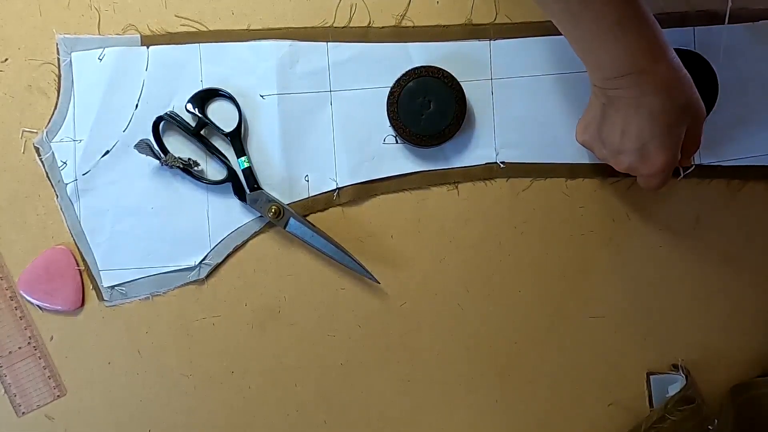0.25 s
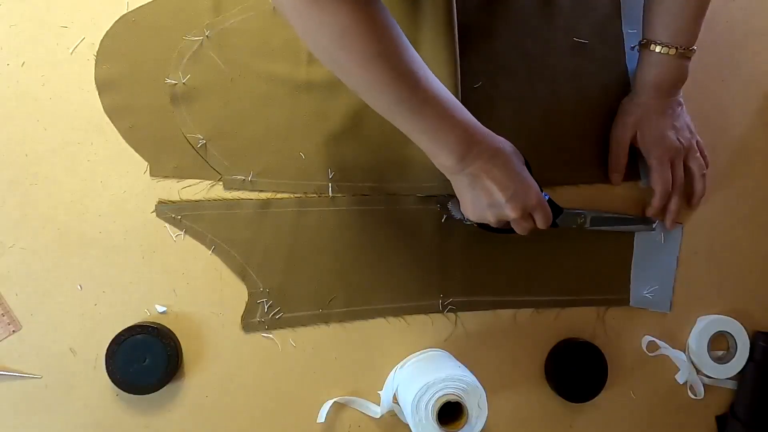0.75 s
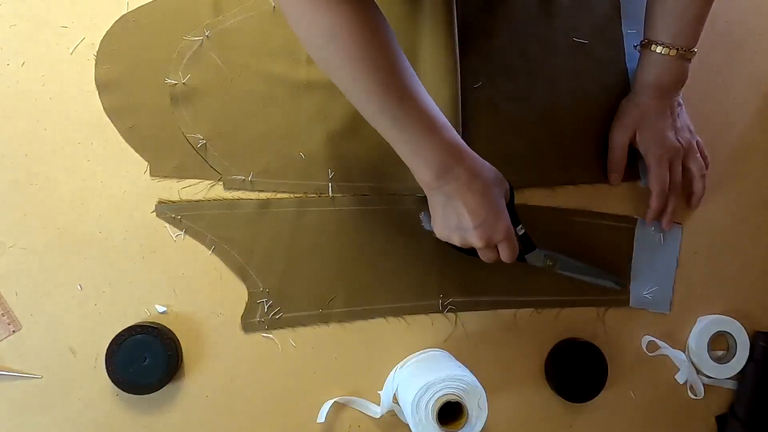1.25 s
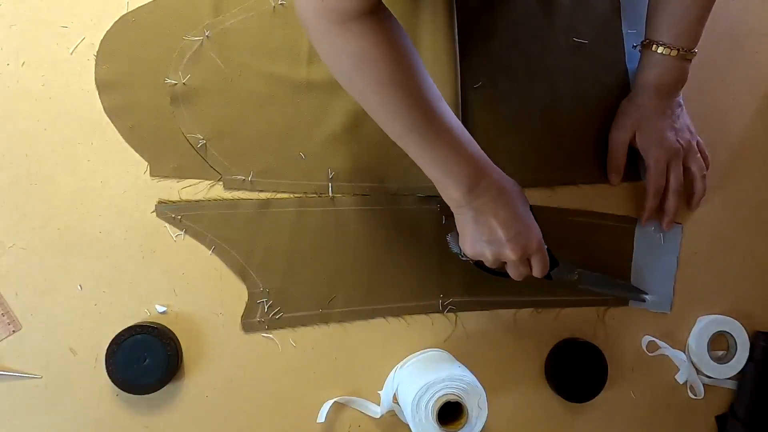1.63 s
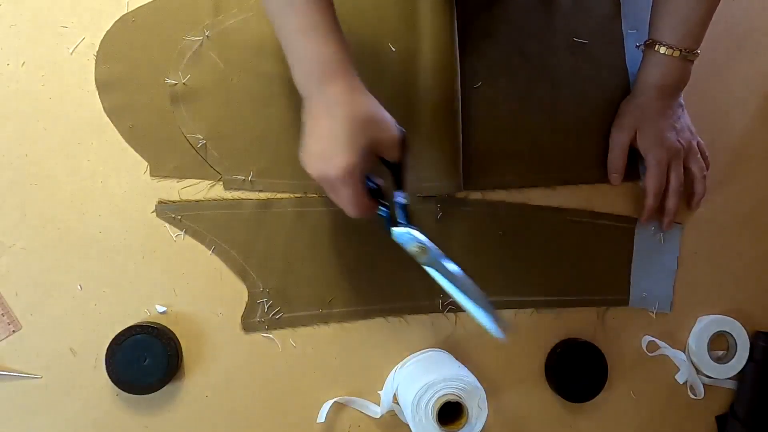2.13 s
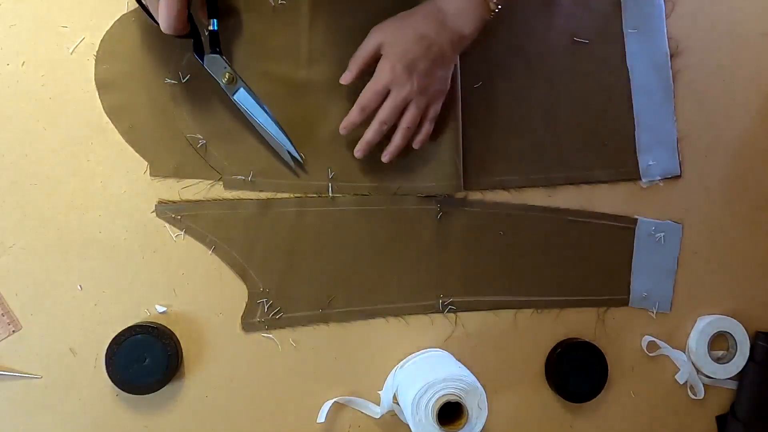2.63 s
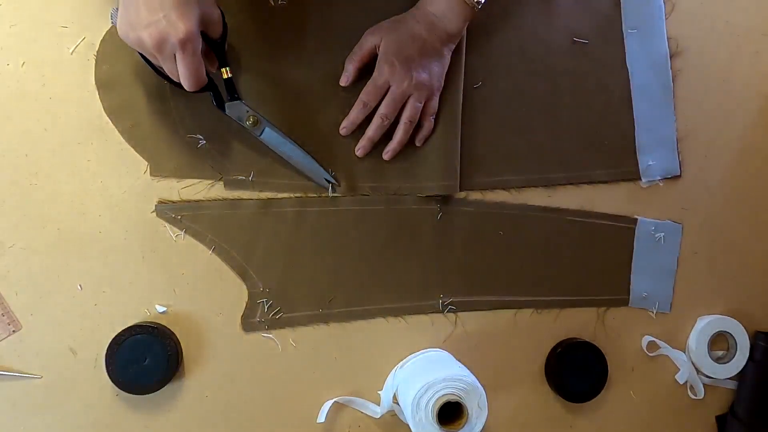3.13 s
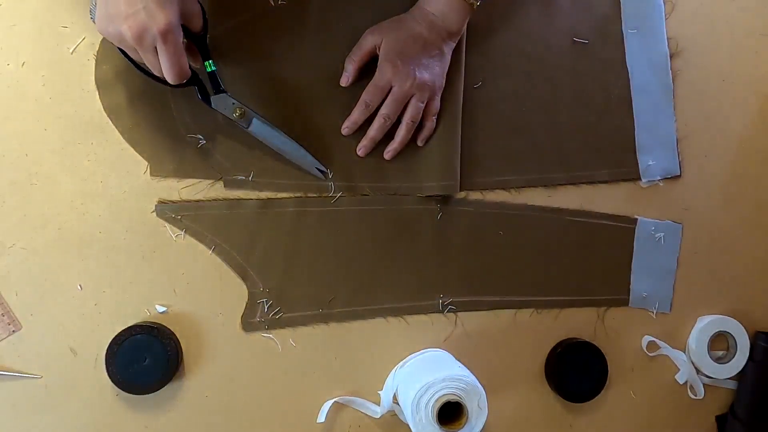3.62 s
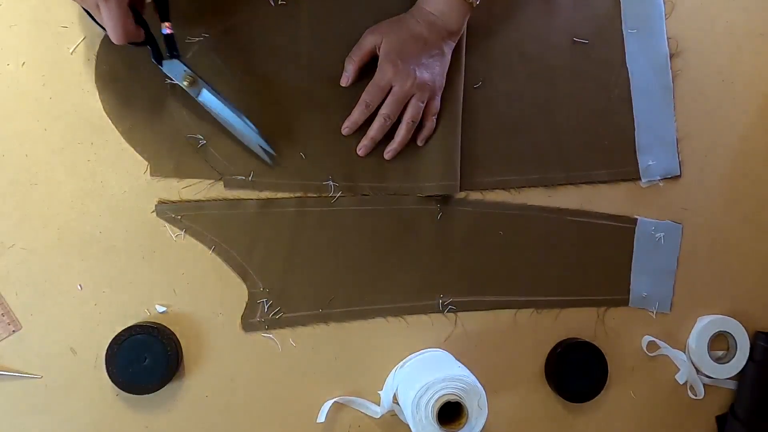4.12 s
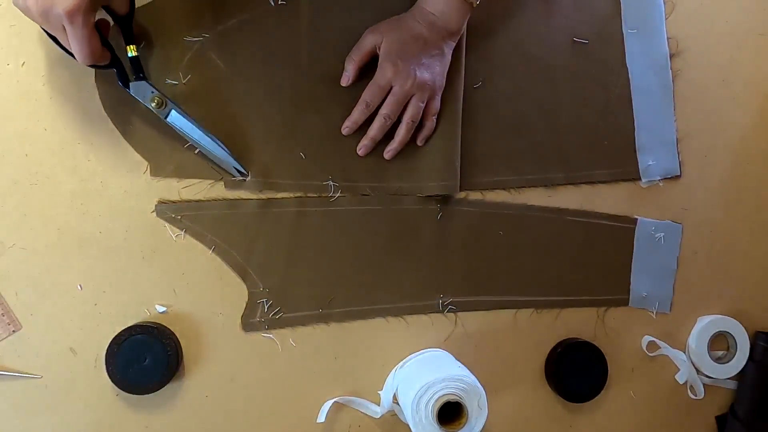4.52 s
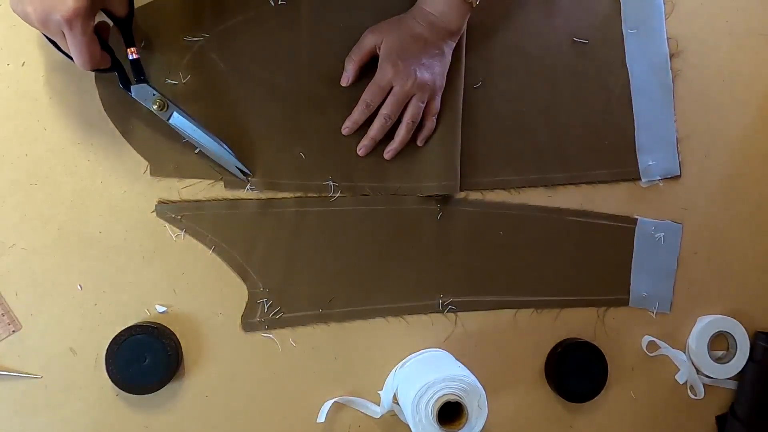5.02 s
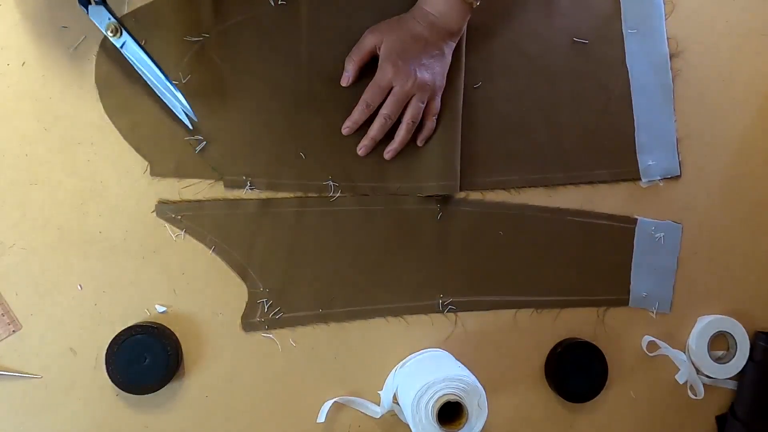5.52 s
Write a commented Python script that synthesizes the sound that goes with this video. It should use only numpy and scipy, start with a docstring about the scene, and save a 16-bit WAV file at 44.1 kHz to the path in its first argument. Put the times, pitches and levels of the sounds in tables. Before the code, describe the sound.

Eight uneven scissor snips, dry and close, with dull bumps through the tabletop, a brief hand sweep on fabric and faint room air.

```python
"""Tailor's shears snip threads on cloth over a wooden worktable, a two-port phone held above.
Blades hiss shut and open as friction noise drives steel modes; their clacks are decaying steel modes.
Blows and a murmur sound the table's low modes, the handles thud, and shaped noise makes a hand's
sweep over the cloth, the reflections and the room air. Early on a low hum is cut by a brief silence."""
import sys
import numpy as np
from scipy import signal
from scipy.fft import rfft, irfft
from scipy.io import wavfile
from scipy.ndimage import uniform_filter1d

SR = 44100
rng = np.random.default_rng(int(sys.argv[2]) if len(sys.argv) > 2 else 0)


def dump(signal):
    """Clip the signal to [-1, 1] and save it as 16-bit WAV at the path in sys.argv[1]."""
    limited = np.clip(np.atleast_2d(signal).T, -1, 1)
    pcm = np.round(limited * 32767).astype(np.int16)
    wavfile.write(sys.argv[1], SR, pcm)


N = 254016
T = np.arange(N) / SR
HZ = np.maximum(np.fft.rfftfreq(N, 1 / SR), 1)

# Blades clacking shut, and at 1.371 s the shears landing on the table with a metal ring. # Each row: time in
# seconds, level in dB, brightness in dB per octave, # weight below 3 kHz in dB, lag of the left port in ms,
# peak of the handle thud in dB.
CLACK_EVENTS = [(.4751, -39, 2, 6.5, 0.0559, -41), (1.098, -48, 0, 7.5, 0.0553, -45),
                (1.371, -57, 3, -3.5, 0.0632, -47), (2.0034, -38, 1.76, 3.2, 0.0591, -49.5),
                (3.3902, -59.5, -3.5, 4.5, 0.0226, -62.5), (4.0615, -43, 2.01, 5.5, 0.024, -54.5),
                (4.8926, -48.5, 2, 4.5, .016, -58.5), (5.3685, -40.5, 3.5, 4.5, 0.0157, -50)]
# Steel modes of the shears. Each row: frequency in Hz, relative level in dB, t60 in seconds at damping 1.
STEEL_MODES = [(1021, -16.5, 0.032), (1288, -17.5, 0.047), (1657, -17, 0.043), (2153, -8, 0.033),
               (2441, -4.5, 0.02966), (3004, -10, 0.034), (3531.4, -12.5, 0.043), (3934, -7, 0.04),
               (4309, -4.5, 0.029), (4749, 3, 0.025), (5207, 0, 0.022), (5933, -4.5, 0.017),
               (6745, 0, 0.034), (7463, -2.5, 0.024), (7989, -6, 0.035), (8190, 2.5, 0.022),
               (8799, 1.5, 0.03364), (9545, 4, 0.015), (10225, -13, 0.046), (10930, -7, 0.02),
               (11936, -12, 0.031), (12557, -16, 0.039), (13470, -17.5, 0.033)]
STEEL_HZ = np.array(STEEL_MODES)[:, 0]
SLIDE_RANGE_DB = 30.5  # strokes start and end this far below full level
DROP_S, BACK_S = .3226, .338  # the silence begins and ends


def undb(db):
    """Amplitude ratio: decibels to gain."""
    return 10 ** (np.asarray(db) / 20)


def unit(x):
    """Power normalisation: scale to rms 1."""
    return x / np.sqrt(np.mean(x ** 2))


def along(curve, column=1, hz=HZ):
    """Interpolation of a table column on a log-frequency axis."""
    curve = np.array(curve)
    return np.interp(np.log(hz), np.log(curve[:, 0]), curve[:, column])


def gain(curve):
    """Amplitude envelope: a level curve in dB as gain, silent outside its span."""
    s, db = np.transpose(curve)[:2]
    level_db = np.interp(T, s, db, left=-200, right=-200)
    return uniform_filter1d(undb(level_db), size=99)


def walk(rate):
    """Slow random modulation: levels held 1 / rate seconds and smoothed twice, rms near 1."""
    hold = int(SR / rate)
    steps = np.repeat(rng.standard_normal(N // hold + 1), hold)
    return 1.3 * uniform_filter1d(uniform_filter1d(steps, hold), hold)[:N]


def ring(modes, seconds, tilt_db=0., scatter_db=0., damp=0.6, turn=0.):
    """Modal superposition: a struck body answers in decaying sines; damp multiplies the decay rate."""
    hz, db, t60 = np.transpose(modes)[:, :, None]
    t = np.arange(round(seconds * SR)) / SR
    size = undb(db + tilt_db * np.log2(hz / 5000) + np.reshape(scatter_db, (-1, 1)))
    sines = np.sin(2 * np.pi * (hz * t + np.reshape(turn, (-1, 1))))  # turn in cycles
    decay = np.exp(-np.log(1000) * t * damp / t60)
    return np.sum(size * sines * decay, axis=0)


def add(track, s, x):
    """Linear superposition: mix x into track from time s."""
    i = int(s * SR)
    track[..., i:i + x.shape[-1]] += x[..., :N - i]


def octave_band(hz, centre):
    """Raised-cosine weighting: one octave to each side of the centre, neighbours summing to 1."""
    return np.cos(np.pi / 2 * np.clip(np.log2(hz / centre), -1, 1)) ** 2


def treble(x, hz, db):
    """Shelving filter: raise or lower what lies above hz."""
    top = irfft(rfft(x) / (1 + (hz / HZ) ** 2), N)
    return x - top + top * undb(db)


def diffuse(colour, flicker_db, alike_more=0.):
    """Partial coherence: octave bands of noise flicker independently, partly shared by both ports."""
    # Likeness of the ports in diffuse sound. Each row: frequency in Hz, likeness from 0 to 1.
    likeness = [(100, 0), (350, 0.4), (2000, 0.28), (5000, 0.08), (12000, 0.2)]
    alike = np.clip(along(likeness) + alike_more, 0, 1)
    noise = rfft(rng.standard_normal((2, N))) * undb(along(colour))
    mid, side = noise * np.sqrt([1 + alike, 1 - alike])
    pair = np.array([mid + side, mid - side])
    out = 0
    for centre in 125 * 2. ** np.arange(8):
        flicker = undb(flicker_db * walk(11))
        out = out + flicker * irfft(pair * octave_band(HZ, centre), N)
    return unit(out)


def air():
    """Diffuse field: room noise whose level and treble drift."""
    # Noise spectrum. Each row: frequency in Hz, relative density in dB per Hz.
    colour = [(70, -47), (120, -9), (150, -4), (210, -6), (370, -10), (490, -12), (560, -18.5), (850, -21),
              (1000, -18.5), (1260, -19), (3000, -28), (6200, -29.5), (8500, -37), (11000, -43),
              (14000, -56.5)]
    # Drift. Each row: time in seconds, level in dB ahead of the treble change, treble gain in dB.
    drift = [(0., -66.5, 12), (.12, -65, -3), (.37, -61, -1.5), (.55, -60.5, 9), (.9, -63, -1.68),
             (1.15, -62.5, 2), (1.54, -64.5, 4.5), (1.9, -65.5, 2.77), (2.3, -63, -1), (2.98, -64, -1.5),
             (3.82, -65, -5.5), (4.302, -65.5, 4.5), (4.669, -66, -0.77), (5.76, -64, -9)]
    s, _, treble_db = np.transpose(drift)
    return treble(diffuse(colour, 1.0), 2600, np.interp(T, s, treble_db)) * gain(drift)


def cloth():
    """Friction noise: fibres hiss under the sweeping palm and get duller as it slows."""
    # Hiss spectrum. Each row: frequency in Hz, relative density in dB per Hz.
    colour = [(300, -10.5), (700, -10), (1020, -3), (1250, -3.5), (1560, 0.5), (1750, -3), (1940, 0.5),
              (2400, -5.5), (3000, -2.5), (3800, -5), (6000, -9), (10000, -24), (14000, -37.5)]
    # Course of the sweep. Each row: time in seconds, level in dB ahead of the treble change.
    sweep = [(2.22, -73.5), (2.27, -68.5), (2.38, -60.5), (2.46, -56.5), (2.58, -54.5), (2.68, -60),
             (2.78, -66.5), (2.9, -85)]
    # Ticks of a bracelet on the sweeping hand. Each row: start in seconds, level in dB, frequency in Hz, t60 in
    # seconds at damping 1.
    bracelet_ticks = [(2.386, -51, 3850, .06), (2.655, -54, 1600, .08)]
    start_treble_db, dulling_db_s = 14, 65.5
    hiss = diffuse(colour, 1.8, .2) * undb(1.2 * walk(45))
    treble_db = np.clip(start_treble_db - dulling_db_s * (T - sweep[0][0]), -60, 20)
    out = treble(hiss, 2830, treble_db) * gain(sweep)
    for s, db, hz, t60 in bracelet_ticks:
        tick = ring([(hz, db, t60)], .1)
        add(out, s, np.convolve(tick, np.hanning(9) / 4))  # softened onset
    return out


def low_hum():
    """Amplitude modulation: a steady low sine rises quickly, wavers in level and stops."""
    hum_hz, full_s, level_db, rise_db_ms = 60.3, 0.17, -39.5, 5.55
    waver_db, waver_hz = 1.5, 11
    since_full = T - full_s
    waver = waver_db * np.cos(2 * np.pi * waver_hz * since_full)
    rise = rise_db_ms * 1000 * np.minimum(since_full, 0)
    sine = -np.sqrt(2) * np.cos(2 * np.pi * hum_hz * (T - DROP_S))
    return sine * undb(level_db + waver + rise) * (T < BACK_S)


def worktable():
    """Modal excitation: blows and a noise-driven murmur sound the low modes of the table top."""
    # Knocks, as when the shears land. Each row: start in seconds, peak in dB,
    # hardness in dB per octave, damping as a factor on the decay rate.
    knocks = [(0.472, -40, -13.5, .38), (.654, -30.5, -9, 0.399), (1.367, -24.5, 3, 0.908),
              (1.984, -39, -6.5, 1.4), (2.304, -41, -7, 1.13), (2.581, -47, -10.5, 1.1),
              (2.8536, -25, 3.5, .86), (3.351, -41.5, 5.5, 0.26), (3.5639, -27.5, -1.5, 0.42),
              (3.971, -39.5, -5.5, 0.72), (4.067, -38, -8, 2.1), (4.321, -20.5, 1.87, 0.739),
              (4.885, -48, 8.5, 1.04), (5.363, -35.5, -10, 0.62), (5.7535, -21, 12, .37)]
    # Table-top modes. Each row: frequency in Hz, relative level in dB, t60 in seconds at damping 1.
    modes = [(43, -10, 0.26), (69.83, 1, 0.2324), (93.56, 2, 0.13), (125.68, 3.5, 0.1137),
             (153.25, -8, .21), (206.02, -5, 0.067), (273.9, -22, 0.15), (330.1, -17, 0.046),
             (392.3, -29, .1)]
    # Murmur of arms shifting their weight. Each row: time in seconds, level in dB.
    murmur_level = [(0., -43.5), (.14, -58.5), (.29, -54.5), (.55, -55), (1.01, -57), (1.28, -65),
                    (1.51, -51), (1.76, -66), (1.92, -53.5), (2.4, -67), (2.79, -57), (3.2, -67),
                    (3.45, -57.5), (4.4, -60), (4.75, -60.5), (4.97, -52.5), (5.42, -62.5), (5.76, -57.5)]
    swell_ms = 4.78
    out = np.zeros(N)
    t = np.arange(SR // 4) / SR
    for s, db, tilt_db, damp in knocks:
        # the boom needs a moment to spread over the top, and is gone after a quarter second
        swell = np.tanh((t * 1000 / swell_ms) ** 2)
        boom = ring(modes, len(t) / SR, tilt_db, damp=damp) * swell * np.cos(2 * np.pi * t)
        add(out, s, -boom * undb(db) / abs(boom).max())
    turn = np.arange(len(modes)) / 2
    response = ring(modes, 0.23, -5.0, damp=2.0, turn=turn)
    murmur = unit(signal.fftconvolve(rng.standard_normal(N), response)[:N])
    return out + murmur * gain(murmur_level)


def thuds():
    """Impact excitation: the plastic handles bump together as the blades close or the shears land."""
    # Handle modes. Each row: frequency in Hz, relative level in dB, t60 in seconds at damping 1.
    modes = [(252, 1.5, 0.052), (368.6, -8.5, 0.25), (501, 0, 0.033), (730.5, -8.5, 0.14),
             (973, -10.5, 0.088)]
    out = np.zeros(N)
    for s, *_, db in CLACK_EVENTS:
        bump = ring(modes, 0.042, turn=rng.random(len(modes)))
        bump = np.convolve(bump, np.hanning(24))  # soft contact
        add(out, s, bump * undb(db) / abs(bump).max())
    return out


def reflections(x):
    """Reverberation: table, cloth and walls return a noise tail whose treble dies first."""
    # Decay of the room. Each row: frequency in Hz, t60 in seconds.
    decay_times = [(1000, 0.16), (4000, 0.13), (14000, 0.018)]
    gap_s = 0.00068  # time constant of the tail's onset
    t = np.arange(int(.35 * SR)) / SR
    hz = np.maximum(np.fft.rfftfreq(len(t), 1 / SR), 1)
    noise = rng.standard_normal((3, len(t)))
    noise = rfft(noise[:2] + 0.63 * noise[2])  # the third is shared by both ports
    tail = 0
    for centre in 500 * 2. ** np.arange(6):
        decay = np.exp(-np.log(1000) * t / along(decay_times, hz=centre))
        tail = tail + irfft(noise * octave_band(hz, centre), len(t)) * decay
    tail = tail * (1 - np.exp(-t / gap_s))
    tail = tail / np.sqrt(np.sum(tail ** 2) / 2)
    return signal.fftconvolve(x[None], tail, axes=1)[:, :N]


def slide(out, s, db, brightness, rise, hold_ms, fall, dulling=0., stop=np.inf):
    """Friction excitation: grit drives steel damped by the pressed blades; slopes in dB per ms."""
    end_ms = min(hold_ms + SLIDE_RANGE_DB / abs(fall), (stop - s) * 1000)
    ms = np.arange(-SLIDE_RANGE_DB / rise, end_ms, 1000 / SR)
    count = len(ms)
    grit = rng.standard_normal(6000) * undb(2.2 * rng.exponential(size=6000))
    turn = rng.random(len(STEEL_MODES))
    weight_db = 2.0 * rng.standard_normal(len(STEEL_MODES))

    def scrape(tilt_db):
        """Convolution: grit filtered by the steel, its build-up left out."""
        response = ring(STEEL_MODES, 0.022, tilt_db, weight_db, 4.8, turn)
        return unit(np.convolve(grit, response)[900:900 + count])

    dull, bright = scrape(-4.0), scrape(6.0)
    share = np.clip(.5 + (brightness - dulling * np.maximum(ms, 0)) / 20, 0, 1)
    # a broad rasp leaves the edges directly
    rasp = unit(np.diff(uniform_filter1d(grit, size=2))[:count])
    x = (1 - share) * dull + share * bright + 0.16 * rasp
    level_db = db + np.where(ms < 0, rise * ms, -fall * np.maximum(ms - hold_ms, 0))
    add(out, s + ms[0] / 1000, x * undb(level_db) * signal.windows.tukey(count, .06))


def slides():
    """Sliding friction: closing strokes bite at the clack, opening ones die away duller; all stutter."""
    # Closing strokes. Each row: time of full speed in seconds, level in dB,
    # brightness from -10 (dull) to 10 (bright), clipped beyond, sag in dB per ms (negative swells).
    closings = [(0.461, -53.5, -5.5, 3), (1.072, -59, -23, -0.1), (1.985, -55.5, -13, 8.83),
                (3.36, -53.5, 4, 1), (4.027, -55, 15, -0.28), (4.845, -57, 10, -0.18),
                (5.336, -53, 3.5, 0.39)]
    # Opening strokes. Each row: time of full speed in seconds, level in dB, brightness as above.
    openings = [(.629, -54, -0.5), (1.227, -53, -13), (2.212, -53, -8.5), (3.521, -49, 11.5),
                (4.205, -48, 7.5), (5.035, -51, 10), (5.52, -49, 7.5)]
    close_rise_db_ms, close_hold_ms = 0.98, 4.9
    bite_ms, bite_db = 12, 2  # the tips bite just before the clack, relative to its level
    open_rise_db_ms, open_hold_ms, open_fall_db_ms = 2.5, 12.27, 1.05
    dulling_per_ms = 1  # brightness lost
    stutter_db, low_hz = 2.1, 2050  # sliding is too light to move the low modes
    out = np.zeros(N)
    for s, db, brightness, sag in closings:
        shut, shut_db = next(row[:2] for row in CLACK_EVENTS if row[0] > s)
        slide(out, s, db, brightness, close_rise_db_ms, close_hold_ms, sag, stop=shut - bite_ms / 1000)
        bite_rise = SLIDE_RANGE_DB / bite_ms
        slide(out, shut, shut_db + bite_db, brightness, bite_rise, 0.904, SLIDE_RANGE_DB)
    for s, db, brightness in openings:
        slide(out, s, db, brightness, open_rise_db_ms, open_hold_ms, open_fall_db_ms, dulling_per_ms)
    stuttering = out * undb(stutter_db * walk(220))
    out = irfft(rfft(stuttering) / (1 + (low_hz / HZ) ** 4), N)
    return np.array([np.roll(out, 1), out])  # the left port hears it one sample late


def clacks():
    """Impact excitation: edges meet within about a millisecond, ring the steel; the loose pivot rattles."""
    bounce_ms, bounce_db = 1.2, -4.5  # mean gap and loss per touch before the edges rest
    free_ring_db, rattle_db = -12.5, -14.5  # relative to the meeting edges
    rattle_low_hz = 1700  # rattling is too light to move the low modes
    out = np.zeros((2, N))
    count = int(.15 * SR)
    t = np.arange(count) / SR
    seconds = count / SR
    low = STEEL_HZ < 3000
    light_db = -20 * np.log10(1 + (rattle_low_hz / STEEL_HZ) ** 4)
    for s, db, tilt_db, low_db, lag_ms, _ in CLACK_EVENTS:
        turn = rng.random(len(STEEL_MODES))
        weight_db = low_db * low + 1.5 * rng.standard_normal(len(STEEL_MODES))
        meet = ring(STEEL_MODES, seconds, tilt_db, weight_db, damp=6.0, turn=turn)
        meet = unit(meet * np.tanh((t / 0.00116) ** 2))
        # the edges touch several times before they rest
        gaps, sizes = rng.random((2, 4))
        touch_s = np.cumsum(gaps * 2) * bounce_ms / 1000
        touches = np.zeros(count)
        touches[(touch_s * SR).astype(int)] = undb(bounce_db * np.arange(1, 5)) * (sizes + .5)
        touches[0] = 1
        meet = unit(signal.fftconvolve(meet, touches)[:count])
        shake = rng.standard_normal(count) * np.exp(-np.log(1000) * t / 0.16) * np.minimum(t / 0.0011, 1)
        response = ring(STEEL_MODES, 0.069, tilt_db, weight_db + light_db, damp=4.5, turn=turn)
        rattle = unit(signal.fftconvolve(shake, response)[:count])
        # once shut, the blades ring on freely under the clack
        free = ring(STEEL_MODES, seconds, tilt_db, weight_db + light_db, damp=0.51, turn=turn)
        free = unit(free * np.tanh(t / 0.0033))
        x = (meet + undb(free_ring_db) * free + undb(rattle_db) * rattle) * undb(db)
        lag = np.exp(-2j * np.pi * np.fft.rfftfreq(count, 1 / SR) * lag_ms / 1000)
        late = irfft(rfft(x) * lag, count)
        add(out, s - .0006, np.array([late, x]))
    return out


def ports(left, right):
    """Interchannel level and phase: each port colours what reaches it, and the left one lags."""
    # Port contrast. Each row: frequency in Hz, left minus right in dB, lag of the left in radians.
    contrast = [(59.6, 2.5, 0.03), (164, 0.5, .05), (361, -2, 0.1), (700, -3, 0.26), (1400, -0.07, 0.2),
                (2167, 2.5, 0.37), (3970, 2.5, .4), (5870, 2.5, 0.14), (6950, 0.5, 0.23), (8520, 0.5, 0.2),
                (10800, -6, 0.38), (14600, -4, 0.14)]
    # half of the contrast goes to each port
    half = undb(along(contrast) / 2) * np.exp(-.5j * along(contrast, column=2))
    return np.array([irfft(rfft(left) * half, N), irfft(rfft(right) / half, N)])


def scene():
    """Superposition of shears, reflections, table, hum, cloth and air, with one brief silence."""
    room_db, fade_s = -5.5, .03
    # blades are too slim to radiate bass
    shears = irfft(rfft(clacks() + slides()) / (1 + (800 / HZ) ** 4), N)
    mix = air() + cloth() + low_hum() + worktable() + thuds()
    mix = mix + undb(room_db) * reflections(shears[1]) + shears
    # sound stops at once and fades back in
    heard = np.where(T < DROP_S, 1, np.clip((T - BACK_S) / fade_s, 0, 1))
    return ports(*mix) * heard


def record(dry):
    """Low-pass filtering: the phone cuts the top."""
    top_hz = 15600
    return signal.sosfilt(signal.ellip(8, .2, 70, top_hz, fs=SR, output="sos"), dry)


dry = scene()
out = record(dry)
dump(out)
```